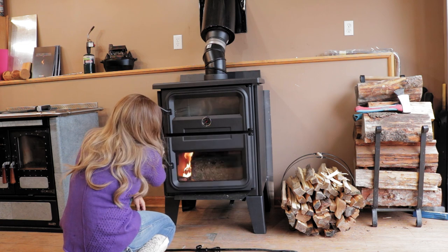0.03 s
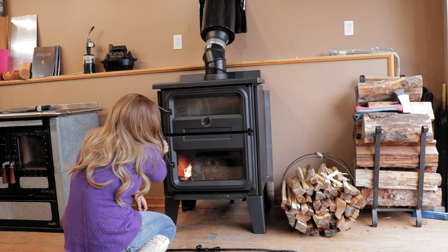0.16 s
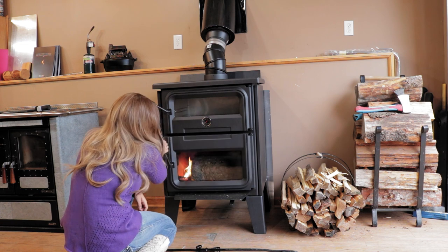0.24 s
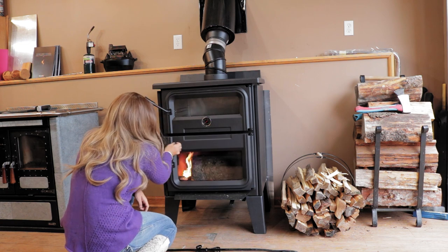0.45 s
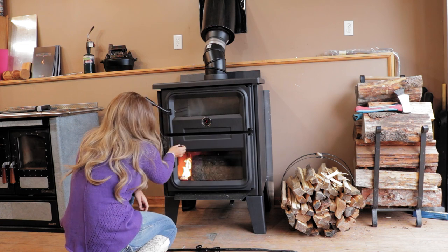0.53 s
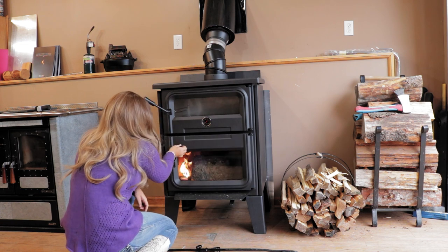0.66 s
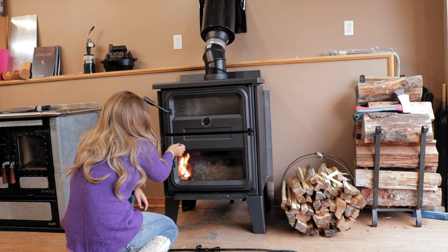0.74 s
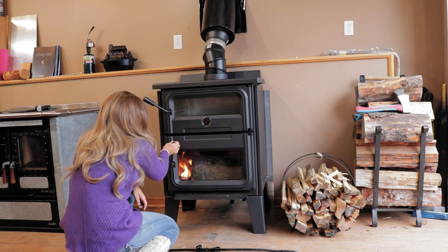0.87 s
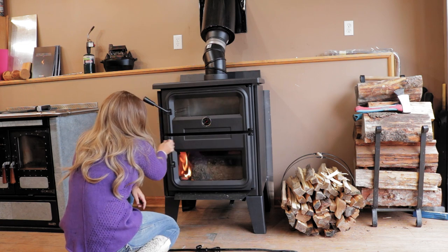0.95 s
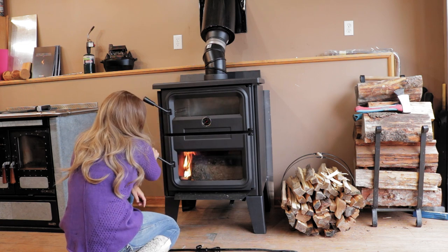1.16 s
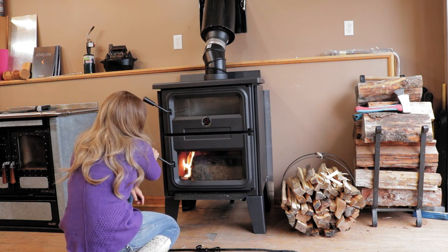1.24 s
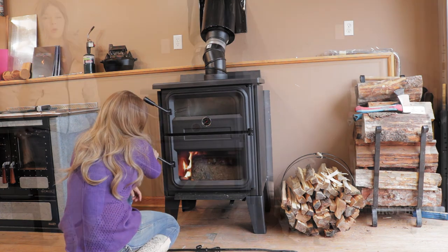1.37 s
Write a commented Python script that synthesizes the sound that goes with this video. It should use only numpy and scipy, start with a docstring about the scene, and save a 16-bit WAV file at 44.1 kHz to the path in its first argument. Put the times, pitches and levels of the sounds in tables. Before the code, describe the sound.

A heavy iron wood stove door shuts at about 0.2 seconds with a loud clunk and a low boom that rings on, slowly fading. The latch snaps in sharply at 0.45 seconds, the catch scrapes softly near 0.85, and the handle gives a light ringing click at 1.2. Underneath, the fire draws softly with a few faint crackles, heard a few metres away in a living room.

```python
"""A wood stove's fire draws softly and crackles in a living room, a few metres away.
At 0.2 s the heavy iron door is pushed shut: it clacks on its frame, the air inside thumps,
and the steel firebox booms and rings on. At 0.45 s the latch snaps in. At 0.85 s the handle
is pressed home and the catch scrapes. At 1.2 s the handle is let go with a light ringing click."""
import sys
import numpy as np
from scipy import signal
from scipy.io import wavfile
from scipy.ndimage import uniform_filter1d, minimum_filter1d

SR = 44100
rng = np.random.default_rng(int(sys.argv[2]) if len(sys.argv) > 2 else 0)


def log_audio(samples):
    """Write samples as a 16-bit WAV file to the path given in sys.argv[1]."""
    # one column per channel
    frames = np.atleast_2d(samples).T
    # limit to full scale, then quantise
    limited = np.clip(frames, -1, 1)
    pcm = np.round(limited * 32767).astype(np.int16)
    wavfile.write(sys.argv[1], SR, pcm)


N = 61739
T = np.arange(N) / SR
BAND_EDGES_HZ = np.geomspace(32, 16500, 28)

# room decay: freq_hz, t60_s
ROOM_DECAY = [(200, 0.8), (1000, 0.92), (3000, 0.51), (6000, 0.43), (10000, 0.49), (15000, 0.092)]
# left-right likeness of diffuse sound: freq_hz, correlation
STEREO_CORRELATION = [(60, 0.96), (250, .97), (500, 0.83), (1000, 0.77), (2000, 0.067), (12000, 0.034)]
# balance of direct clacks: freq_hz, left_minus_right_db
CLACK_BALANCE = [(300, 0), (1000, 2.5), (2200, -4.5), (4000, 0), (8000, 0), (13000, 2)]

# fire draught and room hiss: freq_hz, density_db
DRAUGHT_SPECTRUM = [(24, -35), (40, -18), (69, -0.5), (96, -16.5), (166, -9), (449, -12.5), (535, -15.5),
                    (704, -15), (1310, -15), (1410, -19), (1600, -20), (2510, -25), (3560, -27),
                    (15500, -40)]
# flue pipe hum: centre_hz, width_hz, lift_db
FLUE_PEAKS = [(64, 4.8, 4.5), (157, 33, 6.5)]
# wood crackles: start_s, level_db
CRACKLE_HITS = [(0.103, -54), (0.653, -41), (0.694, -47)]
# one crackle: freq_hz, density_db
CRACKLE_SPECTRUM = [(1000, 10.5), (4000, 9.5), (9000, -2.5), (15500, -12)]

# released handle rattles: start_s, level_db
HANDLE_RATTLE = [(1.2000, -27.5), (1.207, -37.5)]
# handle clink: freq_hz, density_db
HANDLE_SPECTRUM = [(400, -18), (750, 1.5), (1200, -9.5), (1800, 2), (2400, -13), (3000, 0.5), (3600, -0.5),
                   (4300, -5), (5400, -13.5), (8000, -10.5), (11500, -20.5), (15500, -38)]
# broad handle resonances: centre_hz, width_hz, lift_db
HANDLE_PEAKS = [(3030, 230, 10.5), (4230, 300, 8.5)]
# handle modes: pitch_hz, level_db, t60_s
HANDLE_RING = [(2610, -23, 0.65), (2870, -15.5, 0.26), (3010, -13, 0.28), (3110, -12, 0.19),
               (4194, -13, .2)]

# catch slips: start_s, level_db, tilt_db_per_octave
SCRAPE_SLIPS = [(.847, -34, -1), (.859, -30, .5), (.873, -34.5, -6.5)]
# one slip: freq_hz, density_db
SCRAPE_SPECTRUM = [(300, -6), (550, -12), (720, 12.5), (1000, 3), (1900, 3), (2650, 3.5), (3700, 3.5),
                   (4500, -2), (5700, -13), (7500, -8), (11000, -36), (15500, -49)]
# broad catch resonances: centre_hz, width_hz, lift_db
SCRAPE_PEAKS = [(688, 41, 7), (2660, 170, 5.5)]

# latch catches, then snaps in: start_s, level_db, tilt_db_per_octave
LATCH_SNAPS = [(.4445, -24.5, 5.5), (.4516, -9, -4.5)]
# one snap: freq_hz, density_db
LATCH_SPECTRUM = [(300, -9.5), (600, -9), (850, 1), (1200, -1.5), (1700, 0.5), (2050, 1), (2600, 7),
                  (4100, 5), (5200, 1.5), (7800, 3), (11000, -20), (15500, -42.5)]
# broad latch resonances: centre_hz, width_hz, lift_db
LATCH_PEAKS = [(850, 180, 4), (1660, 210, 10.5), (2450, 390, 6.5), (3550, 220, 6.5), (4180, 380, 6.5)]

# blows that shake the firebox: start_s, level_db
BOX_BLOWS = [(.210, -19), (.453, -36), (.886, -44), (1.201, -43.5)]
# firebox modes: pitch_hz, level_db, t60_s
BOX_RING = [(52.7, -9.5, 1), (67.3, -17, 0.32), (91.8, -8.5, 1.64), (135, -3, 2.2), (143, -9, 2.97),
            (161.2, -1.5, 1.13), (212.44, -6, 2.63), (221.8, -3, 2.23), (272, -12.5, 1.55),
            (304.2, -3.5, 1.2), (350, -11.5, 1.66), (402.3, -10, 1.8), (488.3, -13.5, 1),
            (863, -19.5, 3.06)]
# boom of its plates and flue: freq_hz, density_db
BOOM_SPECTRUM = [(33, -33), (52, -36), (100, -2.5), (150, 2.5), (260, -0.5), (420, -7), (600, -11),
                 (1000, -13), (1500, -17.5), (3000, -44)]
# boom decay: freq_hz, t60_s
BOOM_DECAY = [(50, 2.7), (170, 2.93), (700, 2.3), (3000, 0.78)]
# door pushes air into the firebox: start_s, level_db
AIR_PUSHES = [(.208, -22.5), (.462, -29)]
# modes of that air: pitch_hz, level_db, t60_s
AIR_RING = [(50, -3, 0.48), (63.7, 3.5, 0.26), (82.4, 0.5, 0.29)]
# door seats: start_s, level_db
PANEL_HITS = [(.2205, -4.5)]
# door panel modes: pitch_hz, level_db, t60_s
PANEL_RING = [(250.6, -6, 0.097), (408.3, 2, 0.13), (430.5, -22, 0.56), (611, -20, 0.28), (660, -5, 0.033)]

# door meets frame, edge after edge: start_s, level_db
DOOR_CONTACTS = [(0.2097, -6), (0.212, -12.5), (0.2215, -10.5)]
# door clack: freq_hz, density_db
DOOR_SPECTRUM = [(200, 8), (700, 4), (1350, 2), (1900, -10), (2400, -2), (3100, -1.5), (3700, -2),
                 (4350, -4), (5000, -11), (7600, -8.5), (9700, -5), (11200, -13), (15500, -31)]
# broad door resonances: centre_hz, width_hz, lift_db
DOOR_PEAKS = [(1290, 180, 6.5), (2880, 116, 4), (3040, 190, 6.5), (3155, 90, 7.5), (4330, 120, 11),
              (5150, 84, 4.5), (6140, 310, 7.5), (9000, 210, 6.5), (9960, 270, 6.5)]
# iron frame modes: pitch_hz, level_db, t60_s
FRAME_RING = [(1223, -23.5, 0.37), (1367, -12, 0.16), (1373, -28, 0.13), (2684, -22, 0.064),
              (3045, -12, 0.04), (3026, -13, 0.059)]
# shimmer of the door plates: freq_hz, density_db
SHIMMER_SPECTRUM = [(500, 5.5), (1300, -3), (2000, -1), (3100, 1.5), (5000, -7), (7500, -6.5), (9500, -16),
                    (11500, -30), (15500, -37)]


def from_db(db):
    """Decibels to gain."""
    return 10 ** (np.asarray(db) / 20)


def at_hz(table, hz):
    """Table lookup on a log-frequency axis."""
    freqs_hz, values = np.transpose(table)
    return np.interp(np.log(hz), np.log(freqs_hz), values)


def rise(tau_s):
    """Exponential onset."""
    return 1 - np.exp(-T / tau_s)


def decay(t60_s):
    """Exponential fall, 60 dB in t60_s."""
    return np.exp(-np.log(1000) * T / t60_s)


def noise_bands(min_correlation=0):
    """Third-octave stereo noise, wider towards the treble: yields centre_hz, noise."""
    white = rng.standard_normal((2, 2, N + SR // 4))
    for k, (low_hz, high_hz) in enumerate(zip(BAND_EDGES_HZ, BAND_EDGES_HZ[1:])):
        bandpass = signal.butter(2, [low_hz, high_hz], "band", fs=SR, output="sos")
        mid, side = signal.sosfilt(bandpass, white[k % 2])[:, -N:]
        hz = np.sqrt(low_hz * high_hz)
        correlation = max(at_hz(STEREO_CORRELATION, hz), min_correlation)
        mid = mid * np.sqrt((1 + correlation) / 2)
        side = side * np.sqrt((1 - correlation) / 2)
        yield hz, np.array([mid + side, mid - side])


def dense_ring(spectrum, t60_s_at):
    """Overlapping modes as noise: starts at rms 1, decays per band."""
    bands = [(hz, from_db(at_hz(spectrum, hz)) * band) for hz, band in noise_bands()]
    start_rms = np.std(sum(band for _, band in bands))
    return sum(band * decay(t60_s_at(hz)) for hz, band in bands) / start_rms


def modes(table):
    """Damped sines after one blow, centred."""
    ring = sum(from_db(db) * np.sin(2 * np.pi * hz * T) * decay(t60_s) for hz, db, t60_s in table)
    return np.array([ring, ring])


def strike(hits, ring):
    """One copy of the ring per hit."""
    return sum(from_db(level_db) * np.pad(ring, ((0, 0), (int(start_s * SR), 0)))[:, :N]
               for start_s, level_db in hits)


def clacks(hits, spectrum, t60_s, attack_s=0.00062):
    """One noise burst per hit; an optional third column tilts its spectrum."""
    hz, bands = map(np.array, zip(*noise_bands(min_correlation=0.73)))
    pan_db = at_hz(CLACK_BALANCE, hz) * np.array([[0.5], [-0.5]])
    bursts = 0
    for start_s, level_db, *tilt in hits:
        tilt_db = tilt[0] * np.log2(hz) if tilt else 0
        band_gains = from_db(at_hz(spectrum, hz) + tilt_db + pan_db)
        noise = np.einsum("cb,bcn->cn", band_gains, bands)
        envelope = strike([(start_s, level_db)], (rise(attack_s) * decay(t60_s))[None])
        bursts = bursts + noise / noise.std() * envelope
    return bursts


def resonate(x, peaks):
    """Lift each resonance at constant total rms."""
    lifted = x
    for hz, width_hz, lift_db in peaks:
        band = signal.lfilter(*signal.iirpeak(hz, hz / width_hz, fs=SR), x + 1e-18)
        lifted = lifted + (from_db(lift_db) - 1) * band
    return lifted * x.std() / lifted.std()


def room_echo(x):
    """Diffuse reflections: a unit-energy noise tail per side."""
    tail = dense_ring([(1, 0)], lambda hz: at_hz(ROOM_DECAY, hz)) * rise(tau_s=0.0041)
    tail /= np.sqrt(np.sum(tail ** 2) / 2)
    return signal.fftconvolve(x, tail, axes=1)[:, :N]


def draught():
    """The fire draws air up the flue: steady low rush, slight hiss."""
    noise = sum(from_db(at_hz(DRAUGHT_SPECTRUM, hz)) * band for hz, band in noise_bands())
    rush = resonate(noise, FLUE_PEAKS)
    return from_db(-44) * rush / rush.std()


def crackles():
    """Burning wood: faint bright ticks."""
    return clacks(CRACKLE_HITS, CRACKLE_SPECTRUM, t60_s=0.11)


def handle():
    """The released handle clinks twice; the first contact rings its modes."""
    clink = resonate(clacks(HANDLE_RATTLE, HANDLE_SPECTRUM, t60_s=0.1), HANDLE_PEAKS)
    return clink + strike(HANDLE_RATTLE[:1], modes(HANDLE_RING))


def scrape():
    """The catch slides tight in three soft slips."""
    slips = clacks(SCRAPE_SLIPS, SCRAPE_SPECTRUM, t60_s=0.092, attack_s=0.00067)
    return resonate(slips, SCRAPE_PEAKS)


def latch():
    """The latch catches and snaps in: two short metal contacts."""
    return resonate(clacks(LATCH_SNAPS, LATCH_SPECTRUM, t60_s=0.036), LATCH_PEAKS)


def firebox(swell_s=0.0042):
    """Each blow rings the steel box low and long; the air inside thumps, the door panel clunks."""
    boom = from_db(-2.5) * dense_ring(BOOM_SPECTRUM, lambda hz: at_hz(BOOM_DECAY, hz))
    ring = strike(BOX_BLOWS, (modes(BOX_RING) + boom) * rise(swell_s))
    thump = strike(AIR_PUSHES, modes(AIR_RING) * rise(swell_s))
    clunk = strike(PANEL_HITS, modes(PANEL_RING) * rise(tau_s=0.0024))
    return ring + thump + clunk


def door():
    """Iron on iron: a hard clack; the first contact rings the frame and the door plates."""
    clack = resonate(clacks(DOOR_CONTACTS, DOOR_SPECTRUM, t60_s=0.061), DOOR_PEAKS)
    shimmer = from_db(-18.5) * dense_ring(SHIMMER_SPECTRUM, t60_s_at=lambda hz: 0.77)
    return clack + strike(DOOR_CONTACTS[:1], modes(FRAME_RING) + shimmer)


def limiter(x, ceiling_rms_db=-11, recovery_db_per_s=86, look_ahead_s=0.003):
    """Gain ducks just ahead of sustained loud sound, passes short snaps, recovers steadily."""
    window = int(2 * look_ahead_s * SR)
    power = np.maximum(uniform_filter1d(np.mean(x ** 2, axis=0), window), 1e-12)
    over_db = np.maximum(10 * np.log10(power) - ceiling_rms_db, 0)
    recovery_db = recovery_db_per_s * T
    cut_db = np.maximum.accumulate(over_db + recovery_db) - recovery_db
    gain_db = uniform_filter1d(minimum_filter1d(-cut_db, window), window)
    return x * from_db(gain_db)


def scene():
    """Metal contacts and crackles with room echo, plus firebox and draught."""
    sources = [(door(), -11), (latch(), -3.5), (scrape(), -6.5), (handle(), -3.5), (crackles(), 0)]
    direct = sum(sound for sound, _ in sources)
    echo = room_echo(sum(from_db(send_db) * sound for sound, send_db in sources))
    return direct + echo + firebox() + draught()


def record(dry, low_cut_hz=38, stopband_hz=16600):
    """High-pass, limiter on the slam, steep low-pass."""
    highpass = signal.butter(4, low_cut_hz, "high", fs=SR, output="sos")
    lowpass = signal.cheby2(14, 70, stopband_hz, fs=SR, output="sos")
    return signal.sosfilt(lowpass, limiter(signal.sosfilt(highpass, dry)))


dry = scene()
out = record(dry)
log_audio(out)
```